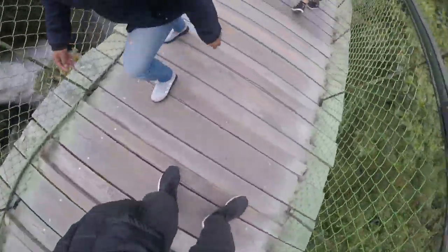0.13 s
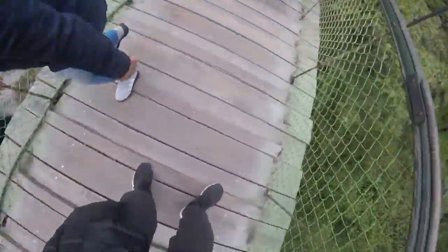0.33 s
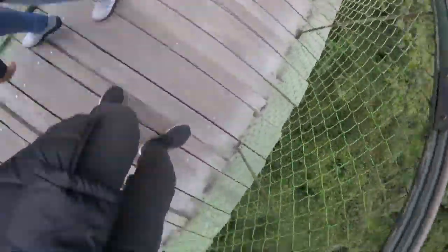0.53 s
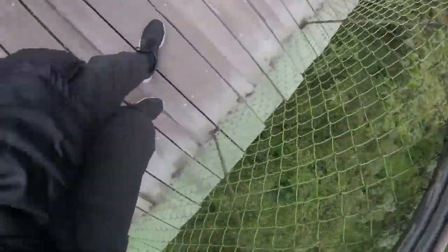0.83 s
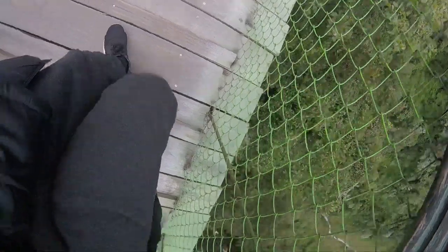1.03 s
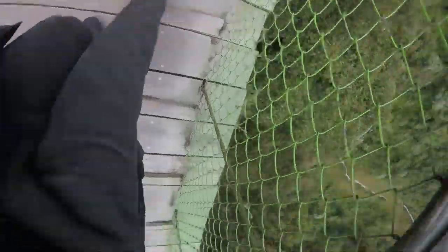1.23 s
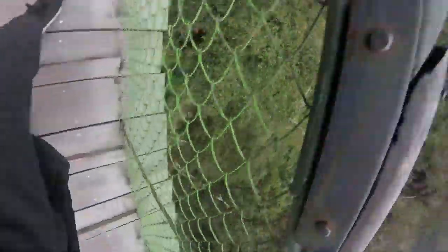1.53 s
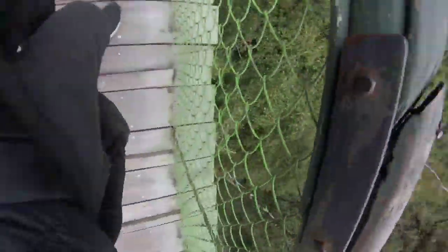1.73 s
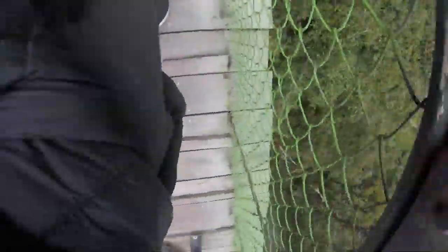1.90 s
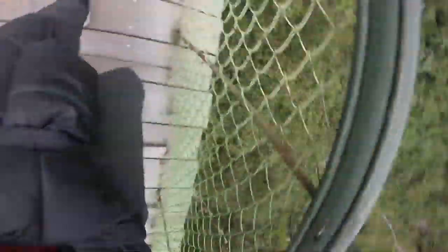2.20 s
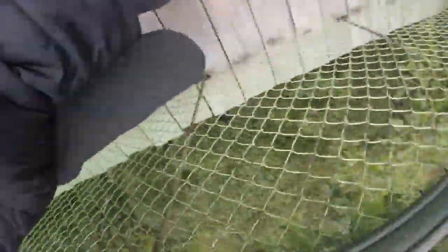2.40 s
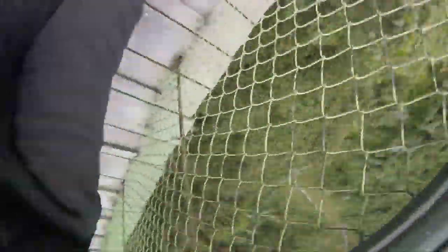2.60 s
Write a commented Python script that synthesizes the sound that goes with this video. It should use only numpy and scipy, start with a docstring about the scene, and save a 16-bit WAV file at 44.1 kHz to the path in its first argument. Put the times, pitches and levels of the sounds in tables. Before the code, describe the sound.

Handling bumps: heavy muffled thuds and hollow clicks against clothing, with distant rapids hissing behind

```python
"""A plank bridge over a gorge, walked across with a small camera worn on the body.
Water rushes far below: patchy noise, lifted where the plastic housing of the microphone resonates.
Close up, cloth touches and scuffs ring the modes of the housing, over a low noise of sway.
Steps and bumps against clothing knock the housing and shove the microphone with low, decaying thumps."""
import sys
import numpy as np
from scipy import signal
from scipy.io import wavfile
from scipy.ndimage import uniform_filter1d

SR = 44100
rng = np.random.default_rng(int(sys.argv[2]) if len(sys.argv) > 2 else 0)


def wrap_up_sound(samples):
    """Save the sound to the file named by the first command line argument, as 16-bit audio."""
    columns = np.atleast_2d(samples).T
    # keep every value between -1 and 1, then stretch to whole-number steps
    tamed = np.clip(columns, -1, 1)
    steps = np.round(tamed * 32767).astype(np.int16)
    wavfile.write(sys.argv[1], SR, steps)


N = 121275  # samples


def amp(db):
    """Decibels to amplitude factor."""
    return 10 ** (np.asarray(db) / 20)


def evened(x):
    """Scale to an RMS of 1."""
    return x / np.sqrt(np.mean(x ** 2) + 1e-20)


def read(points, hz):
    """Read a spectrum curve, straight between its points on a log frequency axis."""
    f, value = np.transpose(points)
    return np.interp(np.log(hz + 1), np.log(f + 1), value)


def add(mix, start_s, sound):
    """Lay a sound into the mix, cut off where the mix ends."""
    part = mix[round(start_s * SR):][:len(sound)]
    part += sound[:len(part)]


def hiss(shape_db, size):
    """Noise from random short-time spectra; shape_db(hz, s) gives the level of each bin."""
    hop = size // 4
    frames, hz = N // hop + 5, np.fft.rfftfreq(size, 1 / SR)
    real, imag = rng.standard_normal((frames, len(hz), 2)).T
    frame_s = np.arange(frames) * hop / SR
    spectra = (real + 1j * imag) * amp(shape_db(hz[:, None], frame_s))
    return signal.istft(spectra, nperseg=size, noverlap=size - hop)[1][:N]


# Spectrum of the far water before the housing colours it: pitch_hz, relative level_db (per Hz)
WATER_SPECTRUM = [(100, 0), (330, -10), (600, -16), (2500, -21), (3900, -23.5), (4300, -24), (5300, -27),
                  (7000, -32), (9000, -37), (13500, -49)]
# Housing resonances that the water passes through: pitch_hz, width_hz, lift_db
HOUSING_RESONANCES = [(403, 52, 1), (1300, 230, 6), (2220, 410, 9), (3310, 510, 8), (3746, 96, 18.5),
                      (6113, 600, 13)]
# Level at which the water is heard, dipping after the hardest bump (relative): time_s, mids_db, treble_db
WATER_HEARD = [(0, -44.5, -55.5), (.23, -40, -53.5), (.27, -49, -64), (.36, -52, -60.5), (.42, -47, -59.5),
               (.66, -46, -58), (.8, -41.5, -54), (1.1, -43.5, -54.5), (1.41, -46, -56.5),
               (1.75, -44, -58.5), (2.0, -46, -58), (2.35, -43, -54.5), (2.75, -42.5, -54)]
SPLIT_HZ, PATCH_DB = 3330, 0.5  # where mids hand over to treble; RMS depth of the patches


def water():
    """Far rapids: patchy noise lifted at the housing resonances; mids and treble have their own levels."""
    s, mids_db, treble_db = np.transpose(WATER_HEARD)

    def shape_db(hz, t):
        lift = sum(db / (1 + (2 * (hz - f) / width) ** 2) for f, width, db in HOUSING_RESONANCES)
        base = read(WATER_SPECTRUM, hz) + lift - 200 * (hz < 90)  # no water below 90 Hz
        power = amp(base) ** 2
        # Each band's own power is taken out, so that the level table sets how loud it is
        mids = 10 * np.log10(power[(hz > 900) & (hz < 4000)].sum())
        treble = 10 * np.log10(power[(hz > 4500) & (hz < 8000)].sum())
        treble_share = 1 / (1 + (SPLIT_HZ / (hz + 1)) ** 8)
        level = (1 - treble_share) * (np.interp(t, s, mids_db) - mids)
        level = level + treble_share * (np.interp(t, s, treble_db) - treble)
        patches = rng.standard_normal((len(t), len(hz))).T
        patches = uniform_filter1d(patches, size=8, axis=0)  # across frequency
        patches = uniform_filter1d(patches, size=16, axis=1)  # across time
        return base + level + PATCH_DB * evened(patches)

    return hiss(shape_db, size=512) / np.sqrt(3)


# Spectrum of the low shaking: pitch_hz, relative level_db (per Hz)
RUMBLE_SPECTRUM = [(15, 8.5), (28, 8.5), (55, 5.5), (80, 1.5), (120, -13), (200, -14.5), (400, -71.5)]
# Sway of bridge and clothing: time_s, level_db (RMS)
SWAY = [(0, -36.5), (0.241, -28.5), (.3, -59), (.4, -38.5), (.9, -32), (1.001, -40.5), (1.599, -37.5),
        (1.85, -31.5), (2.051, -39.5), (2.4, -33.5), (2.75, -30.5)]


def rumble():
    """Low, lumpy shaking carried through the body: low noise whose level follows the sway."""
    s, level_db = np.transpose(SWAY)
    noise = hiss(lambda hz, t: read(RUMBLE_SPECTRUM, hz) + 0 * t, size=4096)
    return evened(noise) * amp(np.interp(np.arange(N) / SR, s, level_db))


MODE_SCATTER_DB, PITCH_SCATTER = 2, 0.02  # each touch lands on another spot; pitch as a fraction
RISE_S = 0.00058  # time constant of a mode's onset


def ring(modes, touch, low_hz, high_hz):
    """A band-limited touch rings slightly detuned, quickly rising modes; loudest stretch near peak 1."""
    t = np.arange(0, .12, 1 / SR)
    body = np.zeros(len(t))
    for pitch_hz, level_db, t60_s in modes:
        level_shift, pitch_shift = rng.standard_normal(2)
        decay = amp(level_db + MODE_SCATTER_DB * level_shift - 60 * t / t60_s)
        body += decay * np.sin(2 * np.pi * pitch_hz * (1 + PITCH_SCATTER * pitch_shift) * t)
    band = signal.butter(3, [low_hz, high_hz], "band", fs=SR, output="sos")
    soft = signal.sosfilt(band, touch)
    out = signal.fftconvolve(soft, body * (1 - np.exp(-t / RISE_S)))
    return out / np.sqrt(2 * uniform_filter1d(out ** 2, size=200).max())


# Body of the housing: pitch_hz, relative level_db, t60_s
CASE_MODES = [(1261, 3, 0.02), (1833, 1.5, 0.0067), (2250, 0, 0.015), (2550, -10, 0.015)]
# Clip or latch: pitch_hz, relative level_db, t60_s
SNAP_MODES = [(1504, 1.5, 0.029), (1685, -1, 0.022), (2270, 1, 0.014), (3340, 2.5, 0.012),
              (3610, 2.5, 0.016), (4580, -4, 0.006), (5390, -7, 0.0051)]
# Hollow of the housing: pitch_hz, relative level_db, t60_s
HOLLOW_MODES = [(180, -5, 0.0092), (316.4, 3.5, 0.028), (422.4, -1.5, 0.076), (449.7, -10, 0.14),
                (766, 3, 0.011)]
LONG_RING_LOW_HZ, LONG_RING_HIGH_HZ = 400, 500  # hollow modes in here take the extra lift
# Bands of a touch that reach the modes
BRIGHT_LOW_HZ, BRIGHT_HIGH_HZ = 930, 5500
HOLLOW_LOW_HZ, HOLLOW_HIGH_HZ = 131.6, 1016


def housing(touch, case_db, snap_db, hollow_db, long_ring_db=0):
    """One touch sounds in the three sets of modes by its own amounts."""
    hollow_modes = []
    for pitch_hz, level_db, t60_s in HOLLOW_MODES:
        is_long = LONG_RING_LOW_HZ < pitch_hz < LONG_RING_HIGH_HZ
        hollow_modes.append((pitch_hz, level_db + long_ring_db * is_long, t60_s))
    case = amp(case_db) * ring(CASE_MODES, touch, BRIGHT_LOW_HZ, BRIGHT_HIGH_HZ)
    snap = amp(snap_db) * ring(SNAP_MODES, touch, BRIGHT_LOW_HZ, BRIGHT_HIGH_HZ)
    hollow = amp(hollow_db) * ring(hollow_modes, touch, HOLLOW_LOW_HZ, HOLLOW_HIGH_HZ)
    return case + snap + hollow


GRIT_DB = 2.5  # spread of the catch sizes


def catches(count, per_s):
    """Cloth catching at random instants: single pushes either way, a few much larger than most."""
    chance, side, size = rng.random((count, 3)).T
    return (chance < per_s / SR) * np.sign(side - .5) * amp(-GRIT_DB * np.log(size + .01))


TAPS_PER_S, TAPS_DB = 60, -55.5  # average rate, RMS level


def faint_taps():
    """Small chance touches of cloth, close by, that stir the hollow modes."""
    touch = catches(N, TAPS_PER_S)
    return amp(TAPS_DB) * evened(ring(HOLLOW_MODES, touch, HOLLOW_LOW_HZ, HOLLOW_HIGH_HZ)[:N])


# Cloth or strap scuffing the housing: start_s, length_s, bright_db (case and snap modes), hollow_db
SCUFF_TIMES = [(0.407, 0.0033, -36.5, -33.5), (1.091, 0.071, -43.5, -39), (1.259, 0.021, -33.5, -46),
               (2.185, 0.016, -59, -38), (2.272, 0.0067, -47.5, -52)]
GRIT_PER_S = 1800  # average catches per second


def scuffs():
    """Uneven catches under a stroke that swells and fades, ringing the housing."""
    out, t = np.zeros(N), np.arange(4000) / SR
    for start_s, length_s, bright_db, hollow_db in SCUFF_TIMES:
        stroke = np.sin(np.pi * np.minimum(t / length_s, 1))
        touch = catches(len(t), GRIT_PER_S) * stroke
        add(out, start_s, housing(touch, bright_db, bright_db, hollow_db))
    return out


# Knocks on the housing: start_s, case_db, snap_db, hollow_db, long_ring_db (lift of the long hollow ring)
KNOCK_TIMES = [(0.1082, -26, -34, -25, -12), (0.1463, -36.5, -58, -33, 4), (0.1963, -40, -51, -37, 6),
               (0.248, -20.5, -26.5, -21.5, 6), (0.377, -43, -58, -36, 3), (0.3962, -42, -40, -30, 19),
               (0.412, -35.5, -31, -31, 2.5), (0.648, -38.5, -41.5, -35.5, -6),
               (0.74, -42.5, -39.5, -36.5, 3), (1.2465, -28.5, -17.5, -38, 11),
               (1.2734, -34, -25.5, -35, 11), (1.2795, -39, -45, -29, -5.5), (1.6686, -42.5, -48, -31, 6),
               (1.698, -29, -43, -29.5, -12), (1.8647, -43, -48, -34.5, 1), (1.8882, -53, -47, -32, -9),
               (2.2183, -42, -31, -33.5, 2), (2.24, -40, -54, -24, 4), (2.284, -43.5, -50, -33.5, 4),
               (2.4009, -41, -50, -30.5, 5), (2.7287, -34.5, -36, -46, -7)]
ROUGH, CONTACT_S = 0.06, 0.005  # roughness beside a tap of 1, its decay time constant
# Rattle of the casing: start, RMS level at the start, decay, low-pass edge
CRACK_S, CRACK_DB, CRACK_T60_S, CRACK_HZ = 0.2487, -34.5, 0.012, 6300


def knocks():
    """Each knock is a tap with a short rough contact; the hardest bump also rattles the casing."""
    out, t = np.zeros(N), np.arange(2000) / SR
    for start_s, *levels_db in KNOCK_TIMES:
        tap = t == 0
        rough = ROUGH * rng.standard_normal(len(t)) * np.exp(-t / CONTACT_S)
        add(out, start_s, housing(tap + rough, *levels_db))
    bright_noise = np.diff(rng.standard_normal(len(t) + 1))
    rattle = signal.lfilter(*signal.butter(4, CRACK_HZ, fs=SR), bright_noise)
    add(out, CRACK_S, evened(rattle) * amp(CRACK_DB - 60 * t / CRACK_T60_S))
    return out


# Shoves of the microphone: start_s, level_db (peak, before push), pitch_hz (at the start), swell_s,
# t60_s, push (factor: its sign is the direction, its size scales the level)
THUMP_TIMES = [(0.021, -19.5, 68, 0.02, 0.083, 0.9), (0.104, -22.5, 67, 0.0051, 0.18, 1),
               (.2443, 1, 108, .002, .16, -1), (0.376, -19.5, 57, 0.0033, 0.16, 0.91),
               (0.412, -17.5, 49, 0.0012, 0.16, 0.89), (.452, -18, 44.6, 0.0038, 0.12, 0.84),
               (0.545, -20.5, 38, 0.015, 0.085, 0.68), (0.668, -5, 29.4, 0.0053, 0.33, -0.67),
               (0.746, -18, 59.5, 0.0069, 0.13, 0.69), (0.881, -26, 67, 0.017, 0.28, 0.5),
               (1.014, -22, 16.2, 0.0079, 0.42, 1), (1.256, -16, 11, 0.011, 0.052, 0.62),
               (1.279, -14, 46, 0.0042, 0.15, 0.83), (1.698, -16.5, 56, 0.0014, 0.22, -0.7),
               (1.755, -26, 40, 0.006, 0.36, 0.62), (1.892, -13, 48, 0.023, 0.033, -1.14),
               (1.922, -18, 37.5, 0.0043, 0.11, -1.22), (2.115, -14, 47, 0.018, 0.027, -0.7),
               (2.13, -9, 13.8, 0.028, 0.16, 0.95), (2.261, -15.5, 36.3, 0.0072, 0.23, -1.27),
               (2.276, 3, 32.8, 0.01, 0.14, 0.41), (2.479, -10, 36, 0.011, 0.036, 0.59),
               (2.641, -30.5, 55, 0.016, 0.4, 0.75)]
REST_HZ = 21.8  # low pitch towards which hard thumps glide
SAG_FROM_DB, SAG_FULL_DB = -15, -7  # weak thumps hold their pitch, strong ones glide fully
SAG_PER_SWELL = 2.6  # time constant of the glide, in swell times


def thump(level_db, pitch_hz, swell_s, t60_s, push):
    """A shove swells, swings back and dies; the harder it is, the closer it glides to the rest pitch."""
    t = np.arange(0, .4, 1 / SR)
    sag = np.clip((level_db - SAG_FROM_DB) / (SAG_FULL_DB - SAG_FROM_DB), 0, 1)
    sag_course = 1 - np.exp(-t / (SAG_PER_SWELL * swell_s))
    pitch = pitch_hz - sag * (pitch_hz - REST_HZ) * sag_course
    envelope = (1 - np.exp(-(t / swell_s) ** 2)) * amp(-60 * t / t60_s)
    shape = envelope * np.sin(2 * np.pi * np.cumsum(pitch) / SR)
    return push * amp(level_db) * shape / abs(shape).max()


def thumps():
    """All the shoves from steps and bumps, right at the microphone."""
    out = np.zeros(N)
    for start_s, *shove in THUMP_TIMES:
        add(out, start_s, thump(*shove))
    return out


def scene():
    """Water, rumble, taps, scuffs, knocks and thumps at one microphone."""
    return (water() + rumble() + faint_taps() + scuffs() + knocks() + thumps())[None]


LOW_CUT_HZ, CEILING, EDGE_HZ = 7, 1.0, 13450  # ceiling is full scale; edge is the top of the band


def record(dry):
    """The microphone channel: low cut, overload on the hardest bump, then a steep treble limit."""
    low_cut = signal.lfilter(*signal.butter(1, LOW_CUT_HZ, "high", fs=SR), dry)
    overloaded = np.clip(low_cut, -CEILING, CEILING)
    band_limit = signal.firwin(511, EDGE_HZ, window=("kaiser", 9), fs=SR)
    return signal.oaconvolve(overloaded, band_limit[None], "same")


dry = scene()
out = record(dry)
wrap_up_sound(out)
```